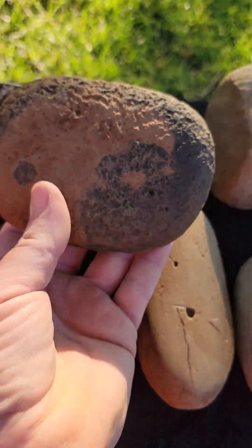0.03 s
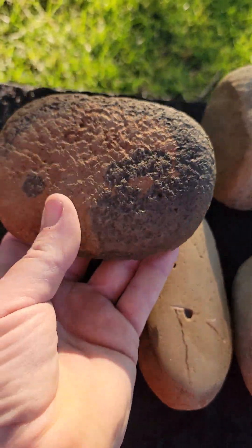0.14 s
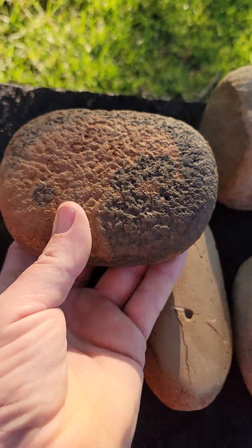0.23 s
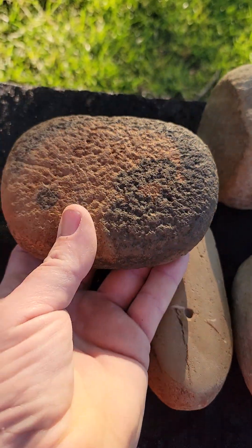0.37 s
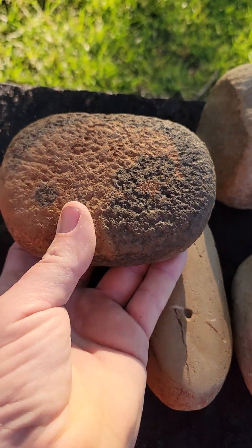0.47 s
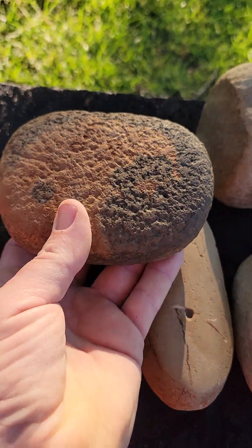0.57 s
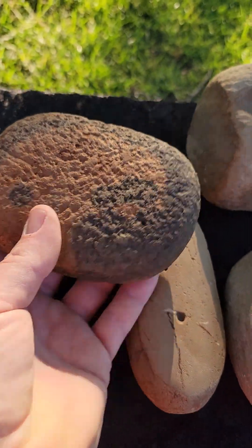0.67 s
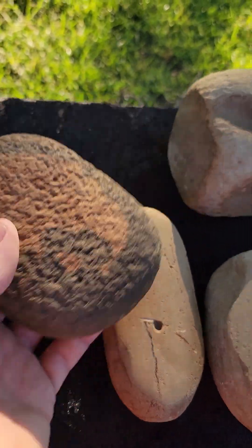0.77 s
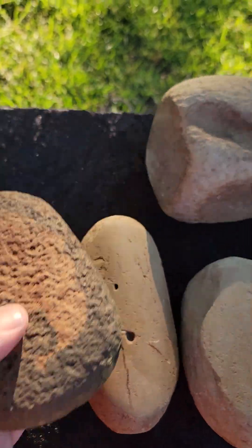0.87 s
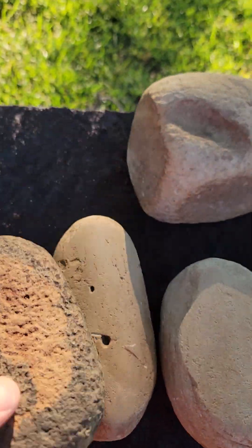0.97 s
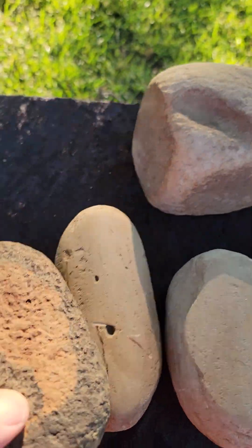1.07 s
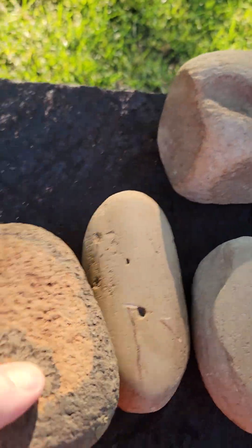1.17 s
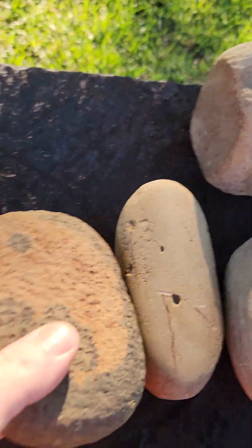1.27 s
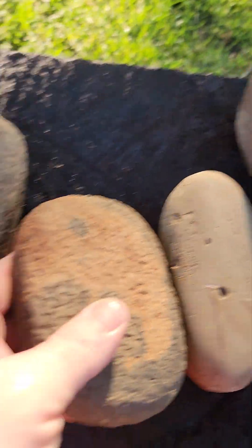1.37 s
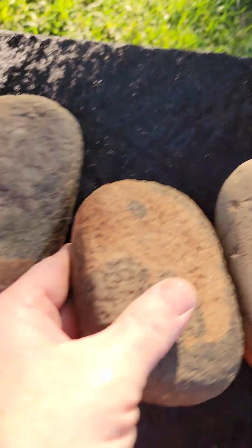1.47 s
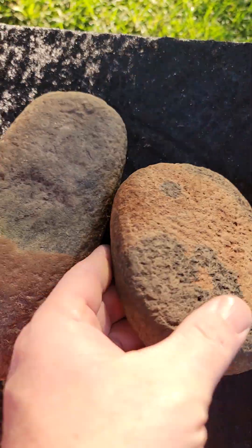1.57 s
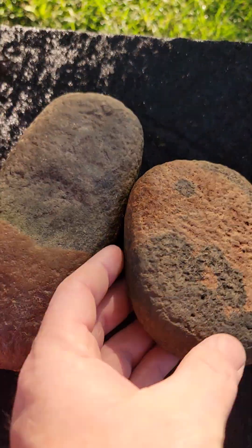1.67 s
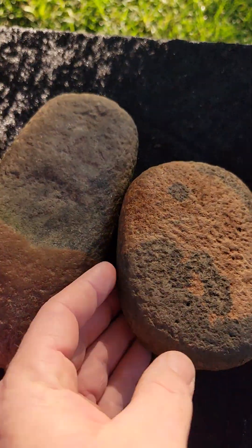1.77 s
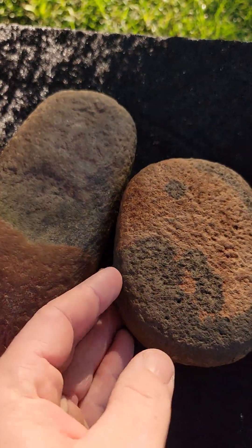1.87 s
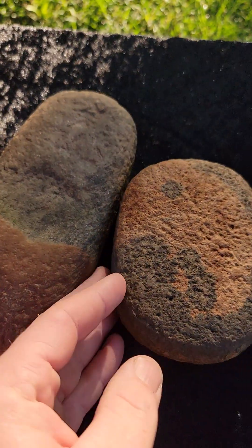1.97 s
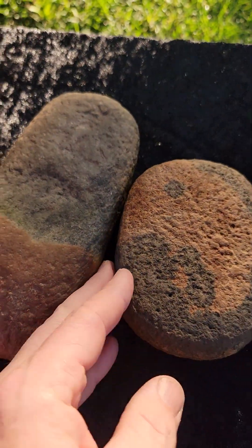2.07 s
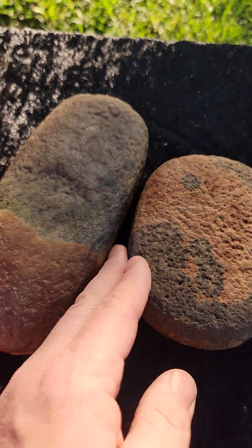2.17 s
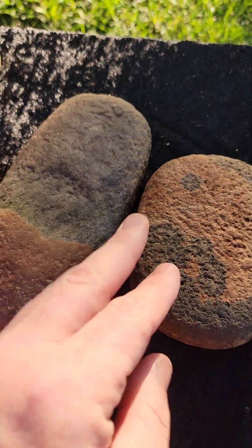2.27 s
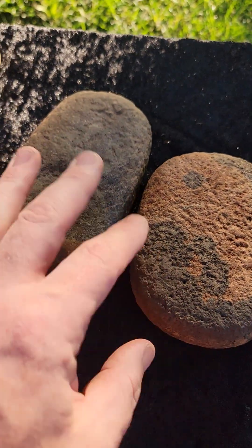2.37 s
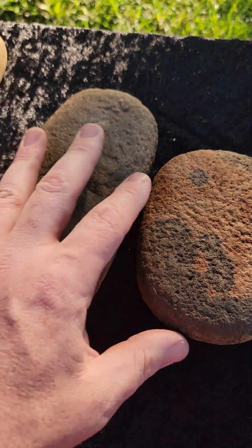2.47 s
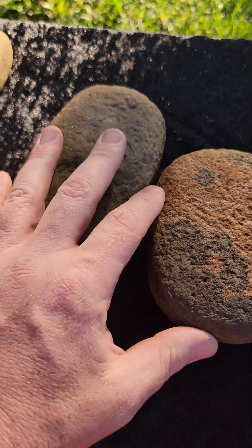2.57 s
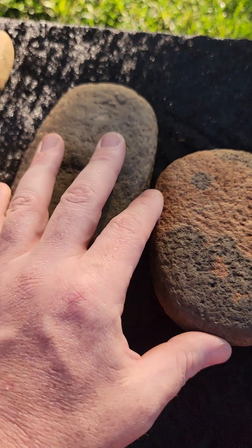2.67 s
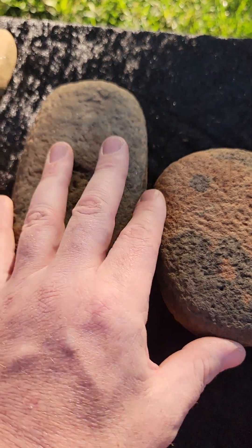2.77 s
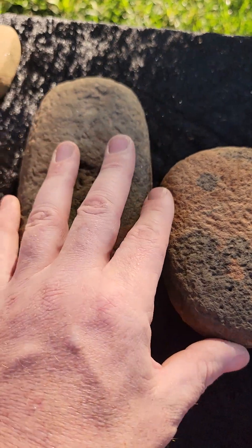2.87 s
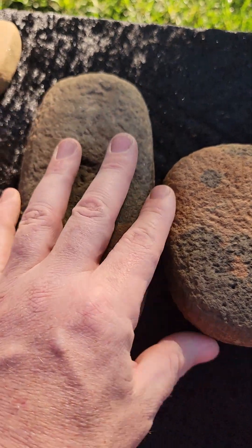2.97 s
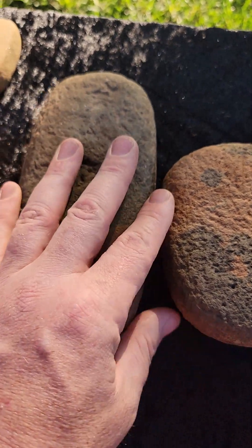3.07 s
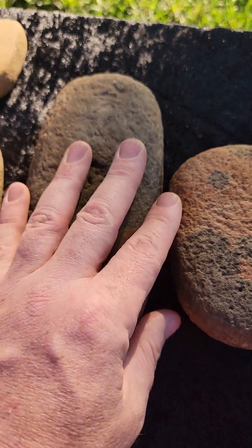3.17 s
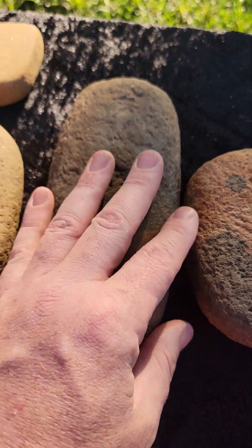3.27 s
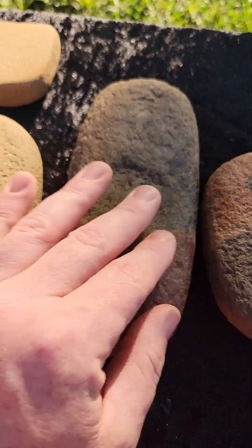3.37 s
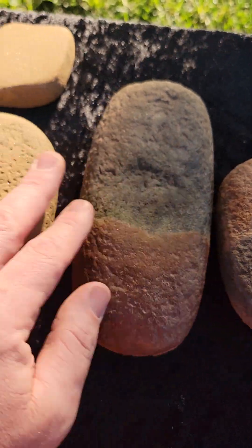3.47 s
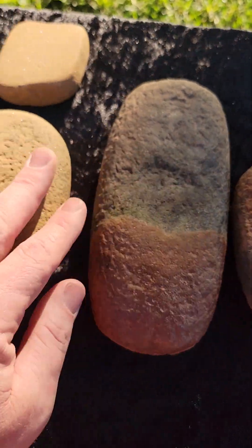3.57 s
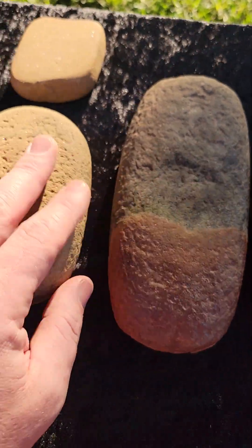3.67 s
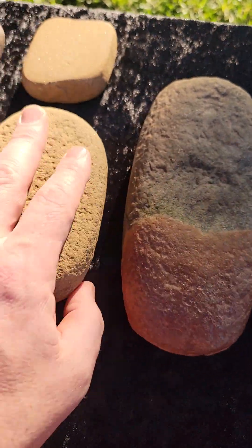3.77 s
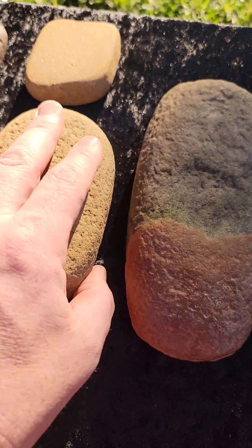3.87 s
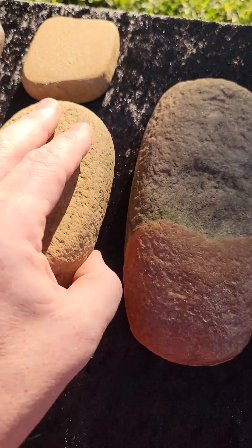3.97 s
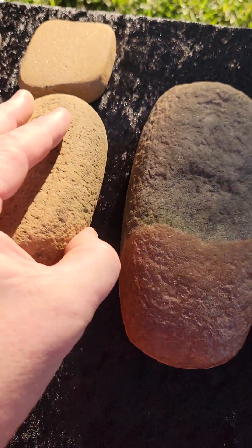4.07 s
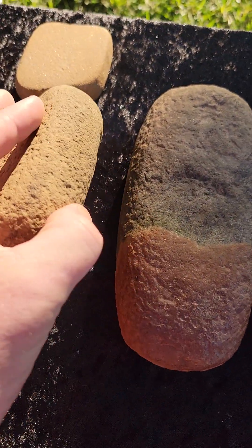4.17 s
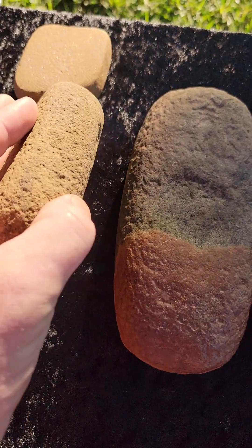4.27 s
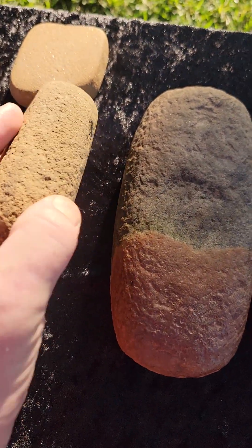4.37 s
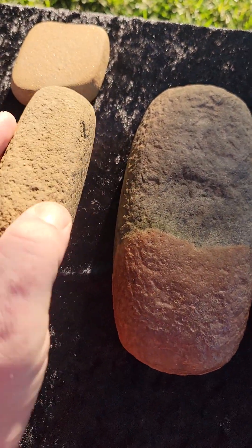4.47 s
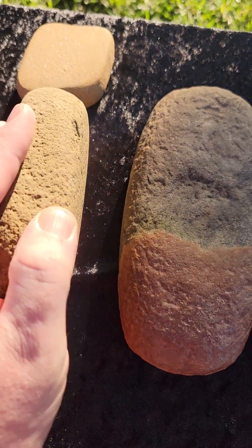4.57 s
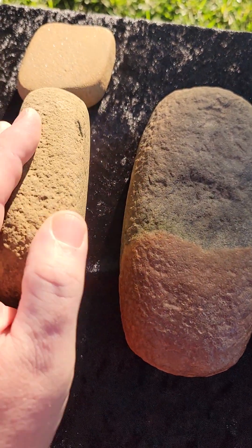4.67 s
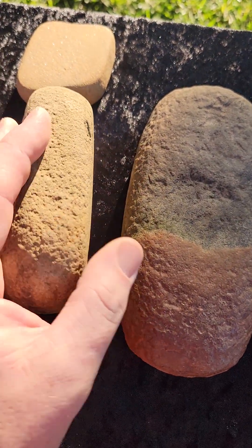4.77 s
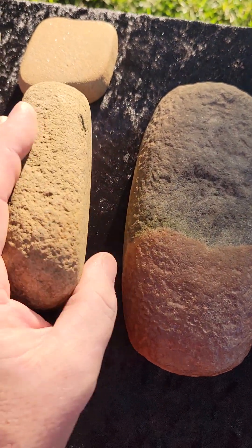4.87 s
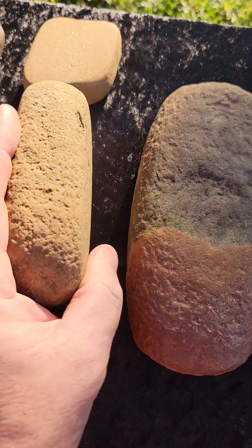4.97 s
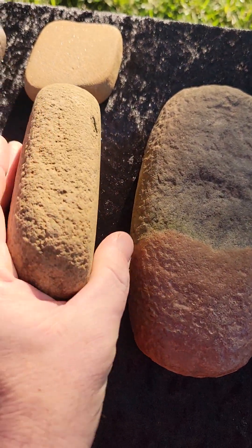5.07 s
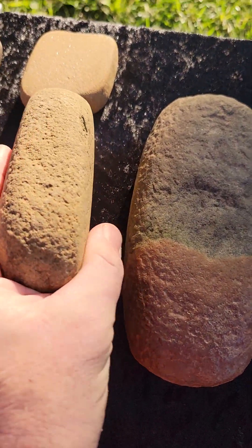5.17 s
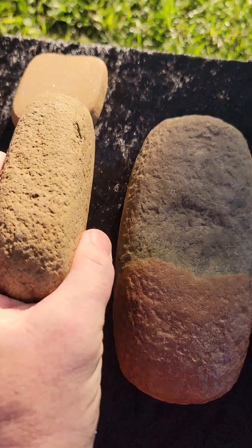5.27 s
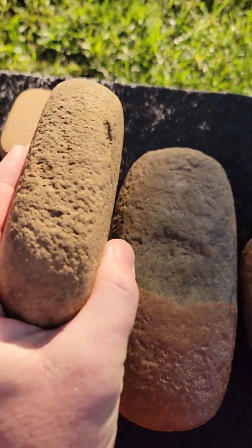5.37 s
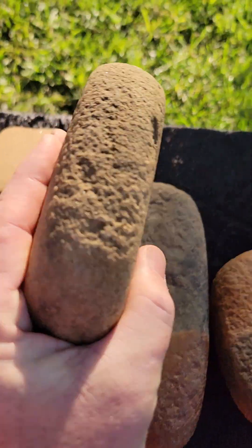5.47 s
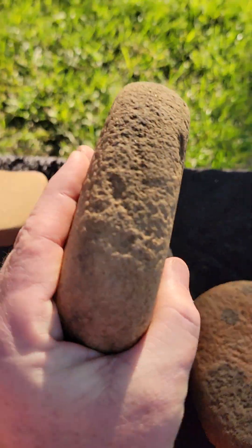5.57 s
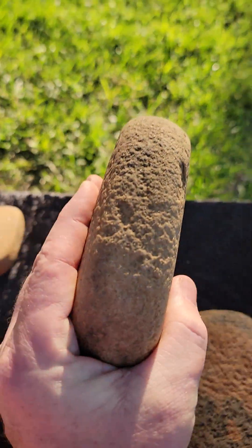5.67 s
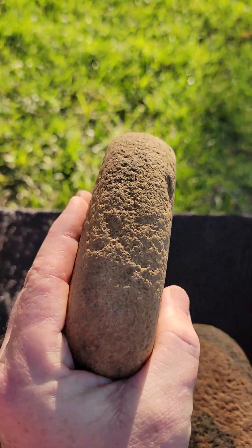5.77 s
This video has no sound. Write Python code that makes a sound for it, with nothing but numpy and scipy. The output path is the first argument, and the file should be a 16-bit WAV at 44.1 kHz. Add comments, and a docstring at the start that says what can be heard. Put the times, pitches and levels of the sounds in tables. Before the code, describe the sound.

A stone is set down with a few sharp clacks and a hollow knock, then quiet handling amid birdsong and far-off road noise.

```python
"""Outdoors: a hand sets river stones down on a hard cover; they click together and knock the panel below.
Clicks are short bursts of partials over decaying panel modes; drags, grazes and skin are shaped noise.
Behind: sine engine notes, a wavering hum and noise rumble; birds are gliding sines with a tree echo,
over a noise chorus, insects and leaf hiss. Two ports: far sound reaches the left one first, by about 0.5 ms."""
import sys
import numpy as np
from scipy import signal
from scipy.fft import rfft, irfft, next_fast_len
from scipy.io import wavfile
from scipy.ndimage import uniform_filter1d, map_coordinates

SR = 44100
rng = np.random.default_rng(int(sys.argv[2]) if len(sys.argv) > 2 else 0)


def to_wav(sig):
    """Store sig (one row per channel, or 1-D mono) as 16-bit WAV at the path in sys.argv[1].

    Samples outside -1..1 are clipped; the rate is SR.
    """
    pcm = np.clip(np.atleast_2d(sig), -1, 1) * 32767
    pcm = np.round(pcm).astype(np.int16)
    wavfile.write(sys.argv[1], SR, pcm.T)  # frames by channels


N = 257140

# steady layers: (t/s, tyre roar level/dB, bird chorus level/dB, insect level/dB)
LAYER_LEVELS = [(0, -52, -63, -57.5), (.25, -52.5, -65, -67), (.8, -60, -70, -73), (1.15, -57, -64, -69.5),
                (1.55, -53.5, -66.5, -73.5), (1.9, -59, -67.5, -71.5), (2.3, -54.5, -68.5, -69.5),
                (2.6, -56, -64.5, -65.5), (2.95, -58.5, -70, -71.5), (3.45, -59.5, -68, -73.5),
                (3.75, -58.5, -68, -71), (4.0, -56.5, -67, -72.5), (4.3, -58.5, -70.5, -75),
                (4.6, -55.5, -66.5, -65.5), (5.05, -57.5, -64, -67), (5.5, -58, -70.5, -72),
                (5.83, -58.5, -66.5, -73)]
# hiss spectrum of leaves and hand: (f/Hz, relative level/dB per Hz)
RUSTLE_SPECTRUM = [(4400, -6.5), (7500, 5), (8300, -3.5), (9700, -2), (11200, -11.5), (12700, -7),
                   (15000, -3.5), (16000, -12)]


def amp(db):
    """Amplitude ratio of a level in dB."""
    return 10 ** (np.asarray(db) / 20)


def unit(x):
    """x scaled to rms 1."""
    return x / np.sqrt(np.mean(x ** 2) + 1e-20)


def along(points, hz):
    """(f/Hz, value) points interpolated on a log frequency axis."""
    f, v = np.transpose(points)
    return np.interp(np.log(hz + 1), np.log(f + 1), v)


def curves(rows):
    """One value per sample for each column after the time."""
    s, *cols = np.transpose(rows)
    return [np.interp(np.arange(N) / SR, s, c) for c in cols]


def wobble(rate_hz):
    """Smooth random curve with rate_hz knots a second."""
    knots = rng.standard_normal(int(N * rate_hz / SR) + 4)
    return map_coordinates(knots, [np.arange(N) * rate_hz / SR])


def filtered(x, response):
    """x with its spectrum multiplied by response(hz)."""
    m = next_fast_len(N + SR // 2)
    return irfft(rfft(x, m) * response(np.fft.rfftfreq(m, 1 / SR)), m)[..., :N]


def ports(left, right, pan_db, late_samples=20):
    """Far sound comes from the left: the right port hears it late_samples later."""
    return np.array([left * amp(pan_db / 2), np.roll(right, late_samples) * amp(-pan_db / 2)])


def rush(spectrum, patchy_db, pan_db):
    """Stereo noise of rms 1, patchy in time and frequency; the ports differ more at high frequency."""
    # likeness of the ports: (f/Hz, correlation [0..1])
    likeness = [(60, 0.9), (130, 1), (300, 0.87), (800, 0.81), (3000, 0.11), (12000, 0.065)]
    z = signal.stft(rng.standard_normal((2, N)), nperseg=512)[2]
    field = uniform_filter1d(rng.standard_normal(z.shape[1:]), size=5, axis=0)
    field = uniform_filter1d(field, size=10, axis=1)
    pair = signal.istft(z * amp(patchy_db * unit(field)), nperseg=512)[1][:, :N]

    def mid_side(hz):
        angle = np.arccos(np.clip(along(likeness, hz), -1, 1)) / 2
        return amp(along(spectrum, hz)) * [np.cos(angle), np.sin(angle)]

    mid, side = filtered(pair, mid_side)
    return unit(ports(mid + side, mid - side, pan_db))


def tone(rows, waver_db, edge_s, flutter):
    """Sine along (t/s, f/Hz, level/dB) rows, faded at both ends; level wavers, pitch flutters."""
    s, hz, db = np.transpose(rows)
    span = np.arange(round(s[0] * SR), min(round(s[-1] * SR), N))
    t = span / SR
    knots = (t - s[0]) / edge_s
    slow, fast = (map_coordinates(rng.standard_normal(200), [speed * knots]) for speed in (.3, 3))
    gate = np.clip(np.minimum(t - s[0], s[-1] - t) / edge_s, 0, 1)
    pitch_hz = np.interp(t, s, hz) * (1 + flutter * fast)
    phase = 2 * np.pi * (np.cumsum(pitch_hz) / SR + rng.random())
    level = amp(np.interp(t, s, db) + waver_db * slow)
    out = np.zeros(N)
    out[span] = np.sqrt(2) * gate * level * np.sin(phase)
    return out


def narrow(rows, size):
    """Soft bursts of noise in one narrow high resonance; a larger size makes it narrower."""
    out = np.zeros((2, N))
    for s, length, hz, db, pan_db in rows:
        t = np.arange(round(length * SR)) / SR
        rough = uniform_filter1d(rng.standard_normal((2, 2, SR))[..., :len(t)], size=size)
        band = rough[0] * np.cos(2 * np.pi * hz * t) + rough[1] * np.sin(2 * np.pi * hz * t)
        swell = np.sin(np.pi * t / length) ** .6
        level = amp([[db + pan_db / 2], [db - pan_db / 2]])
        out[:, round(s * SR):][:, :len(t)] += level * unit(band) * swell
    return out


def far_roads():
    """Rumble, road drone and tyre roar: three shaped noises with wandering levels."""
    # spectra: (f/Hz, relative level/dB per Hz)
    rumble_spectrum = [(8.8, -54), (15, -4.5), (40, -15), (70, 4), (93, 1), (156, -8.5), (200, -13.5),
                       (260, -22), (440, -120)]
    road_spectrum = [(88, -31), (150, -16.5), (195, -3.5), (264, -8.5), (302, -5.5), (430, -13.5),
                     (560, -71), (950, -120)]
    tyre_spectrum = [(250, -28), (430, -15), (488, -3), (527, -5), (816, -1.5), (1130, -2.5), (1800, -17),
                     (2340, -30), (3960, -120)]
    # road drone: (t/s, level/dB)
    road_level = [(0.0, -56.5), (0.41, -59.5), (0.86, -59.5), (1.57, -56.5), (3.68, -60.5), (3.9, -56.5),
                  (4.27, -58), (4.81, -58), (5.29, -58.5), (5.83, -59.5)]
    start_db, growth_db_per_s = -52, .44  # traffic nears
    rumble_db = start_db + growth_db_per_s * np.arange(N) / SR + .8 * wobble(4.2)
    rumble = amp(rumble_db) * rush(rumble_spectrum, patchy_db=1.0, pan_db=-1.0)
    road_db = curves(road_level)[0] + .99 * wobble(5.03)
    road = amp(road_db) * rush(road_spectrum, patchy_db=.1, pan_db=-3.5)
    tyre_db = curves(LAYER_LEVELS)[0] + .35 * wobble(7)
    tyres = amp(tyre_db) * rush(tyre_spectrum, patchy_db=1.1, pan_db=-1.8)
    return rumble + road + tyres


def engines():
    """Far engine notes: one sine per engine pitch, with slow level waver and slight flutter."""
    # speeds up, changes gear, speeds up again; one table a gear: (t/s, f/Hz, level/dB)
    truck = [
        [(0, 126, -58.5), (.7, 128.5, -55), (1.4, 131, -51.5), (2.1, 134, -55.5), (2.8, 137.5, -56.5),
         (3.15, 134, -60)],
        [(2.95, 108.5, -53.5), (3.5, 110.5, -57), (4.2, 112.5, -65.5), (5, 114.5, -55), (5.83, 115.5, -63)],
    ]
    # second engine: (t/s, f/Hz, level/dB)
    car = [(2.2, 65.8, -71), (3, 67.34, -56), (3.5, 68.82, -51.5), (4.001, 70.95, -49), (4.5, 71.9, -71),
           (5, 71.74, -48), (5.4, 71.35, -54), (5.83, 72.6, -50)]
    notes = sum(tone(rows, waver_db=1.5, edge_s=.09, flutter=.004) for rows in (*truck, car))
    return ports(notes, notes, pan_db=-1.5)


def hum():
    """Steady 60 Hz sine of randomly wavering level."""
    level = amp(-57.5 + 4 * wobble(3.92))
    wave = np.sqrt(2) * level * np.sin(2 * np.pi * 60 * np.arange(N) / SR)
    return ports(wave, wave, pan_db=-1.5)


def chorus():
    """Blurred chorus of far birds: patchy band noise."""
    # (f/Hz, relative level/dB per Hz)
    chorus_spectrum = [(880, -26), (1500, -57), (1780, -3), (2070, 7.5), (2260, 2.5), (3220, 1), (3700, 2),
                       (4810, -20), (8140, -120)]
    level = amp(curves(LAYER_LEVELS)[1] + 1.03 * wobble(8.4))
    return level * rush(chorus_spectrum, patchy_db=1.95, pan_db=-2.0)


def insects():
    """Band of insects: patchy high noise."""
    # (f/Hz, relative level/dB per Hz)
    insect_spectrum = [(2060, -48), (3500, -27), (3610, -9.5), (4130, 6), (4920, -3.5), (5320, -5),
                       (6180, -4.5), (7240, -8.5), (8280, -26), (9000, -15), (11700, -33), (19800, -120)]
    level = amp(curves(LAYER_LEVELS)[2] + .96 * wobble(5.5))
    return level * rush(insect_spectrum, patchy_db=2.5, pan_db=-5.0)


def leaves():
    """Leaf hiss: faint, very patchy high noise."""
    return amp(-80.5) * rush(RUSTLE_SPECTRUM, patchy_db=6.5, pan_db=-2.0)


def whine():
    """Thin whine, perhaps one insect: bursts of very narrow noise."""
    # (t/s, length/s, f/Hz, level/dB, left-right level/dB)
    whine_bursts = [(.746, .75, 7040, -78, -10), (3.416, 0.46, 6980, -74, -2), (4.285, .1, 7120, -71.5, -3),
                    (4.415, 0.12, 7170, -69.5, -3), (5.31, 0.33, 7100, -71, -6)]
    return narrow(whine_bursts, size=300)


def murmur(count, db_at_2khz):
    """Many fainter whistles at random moments and pitches, deep in the trees; higher ones are weaker."""
    rows = []
    for when, size, height, *bends in rng.random((count, 5)):
        hz = 2000 * 3 ** height
        middle, end = (1 + .12 * (b - .5) for b in bends)
        db = db_at_2khz - 6 * np.log2(hz / 2000)
        pan_db = 12 * bends[1] - 6
        rows.append((when * N / SR, .02 + .06 * size, hz, hz * middle, hz * end, db, pan_db))
    return rows


def echo(sent):
    """Echo off trees: convolution with decaying noise, decay time set by frequency."""
    # (f/Hz, t60/s)
    tree_decay = [(2000, .27), (6000, .32)]
    hz, t, z = signal.stft(rng.standard_normal((2, SR // 2)), SR, nperseg=256)
    decay = amp(-60 * t / along(tree_decay, hz)[:, None])
    tail = signal.istft(z * decay, SR, nperseg=256)[1]
    return signal.fftconvolve(sent, tail / np.linalg.norm(tail[0]), axes=1)[:, :N]


def near_bird():
    """Two calls of summed whistled strands; the ports get opposite spectral tilts."""
    # one table a strand; calls climb to a top note and fall, over lower held notes: (t/s, f/Hz, level/dB)
    song = [
        [(.812, 2590, -72), (.84, 2640, -64), (.86, 2785, -54.5), (.876, 2830, -60)],
        [(.885, 3020, -54), (.905, 3070, -57), (.93, 3060, -62), (.96, 3000, -62)],
        [(.876, 2920, -60), (.888, 3270, -55), (.897, 3480, -53), (.906, 3580, -58), (.92, 4030, -52),
         (.932, 4090, -52), (.948, 3750, -53), (.958, 3340, -57), (.968, 3110, -58), (.992, 3100, -59),
         (1.0, 3150, -68)],
        [(3.603, 2780, -62), (3.616, 2845, -57), (3.64, 3020, -55), (3.654, 3080, -48), (3.668, 3260, -45),
         (3.682, 3300, -55), (3.7, 3200, -59)],
        [(3.63, 3100, -62), (3.65, 3300, -58), (3.672, 3600, -55), (3.686, 3900, -55), (3.696, 4110, -48),
         (3.712, 4065, -49), (3.721, 3900, -52), (3.726, 3450, -56), (3.732, 3170, -46), (3.741, 3025, -45),
         (3.752, 2900, -62)],
    ]
    # one row a call: (right port late/samples, tilt of higher notes to the right/dB per octave, each port)
    facing = [(22, 3), (14, 14)]
    even_hz = 3550  # no tilt here
    out = np.zeros((2, N))
    for strands, (late, turn_db) in zip((song[:3], song[3:]), facing):
        call = sum(tone(note, waver_db=2.2, edge_s=.005, flutter=.011) for note in strands)

        def tilt(hz):
            octaves = np.log2(np.clip(hz, 2500, 4500) / even_hz)
            return amp(np.outer([-1, 1], turn_db * octaves))

        out += filtered(ports(call, call, pan_db=1.5, late_samples=late), tilt)
    return out


def far_birds():
    """Short whistles, each a sine gliding through three pitches."""
    # (t/s, length/s, start f/Hz, middle f/Hz, end f/Hz, level/dB, left-right level/dB)
    chirps = [(0.233, 0.065, 3000, 2860, 2730, -65, 1), (0.314, 0.07, 2800, 2763, 2805, -59.5, 5),
              (.375, 0.085, 2810, 2760, 2806, -69, 5), (0.534, 0.17, 4250, 4180, 4230, -75, -6),
              (0.797, 0.014, 4340, 4400, 4500, -62, -6), (0.819, 0.024, 4850, 5080, 5360, -59.5, -12),
              (.845, .012, 5450, 5250, 5100, -64, -4), (.858, .018, 5400, 5400, 5350, -68, -2),
              (.806, .014, 3450, 3480, 3450, -67, 4), (0.809, 0.018, 4650, 4840, 5000, -55, 4),
              (0.822, 0.025, 5250, 5500, 5700, -66, 9), (0.84, 0.022, 5000, 4900, 4950, -66, 0),
              (0.84, .022, 5980, 6020, 6050, -65, -2), (4.545, 0.049, 5450, 5420, 5430, -72, -5),
              (0.828, 0.035, 3300, 3340, 3250, -63, 10), (1.056, .03, 5700, 5480, 4870, -72.5, -7),
              (0.885, 0.035, 2320, 2094, 2040, -69, 9), (2.412, 0.022, 4230, 4400, 4600, -69, -8),
              (2.447, .025, 4340, 4640, 4650, -67, -6), (2.54, .035, 3180, 3150, 3200, -70, 3),
              (2.685, 0.054, 2100, 2070, 2020, -68, 1), (2.545, .032, 5400, 5250, 4750, -71, 0),
              (2.578, .018, 2350, 2280, 2230, -70, -8), (2.612, .04, 2250, 2210, 2190, -72, -8),
              (2.704, 0.034, 2970, 3010, 2970, -69, 12), (2.607, 0.025, 5050, 5100, 5100, -70, -1),
              (2.628, .03, 4750, 4700, 4450, -66.5, -5), (2.674, 0.045, 2610, 2460, 2500, -62.5, 4),
              (2.897, 0.06, 2135, 2140, 2130, -69, 4), (2.995, 0.11, 5930, 5940, 5900, -77.5, 1),
              (3.077, .022, 4750, 5330, 5300, -64, 4), (3.086, 0.026, 5300, 5200, 4900, -69, 2),
              (3.109, 0.027, 5950, 6130, 6170, -71, -3), (3.13, 0.025, 4850, 5400, 5100, -66, 7),
              (3.15, 0.039, 4820, 4700, 4200, -73, 1), (3.269, 0.033, 3280, 3450, 3230, -65, -1),
              (3.309, 0.027, 2240, 2300, 2420, -85, 4), (3.327, 0.056, 2560, 2210, 1980, -68.5, 5),
              (3.562, 0.027, 4230, 4400, 4750, -64, -6), (3.583, .035, 4380, 4480, 4400, -68, -4),
              (3.59, .018, 5000, 5300, 5650, -68, -2), (3.572, .015, 5500, 5600, 5650, -71, -2),
              (3.573, 0.032, 5080, 5250, 5300, -63, -4), (3.606, 0.016, 5100, 4900, 4750, -61, -2),
              (3.596, 0.037, 2570, 2590, 2560, -69, 8), (3.807, 0.026, 2070, 2100, 2100, -68, 9),
              (3.906, 0.032, 2540, 2590, 2400, -61.5, 0), (4.105, 0.024, 5620, 5600, 5260, -59.5, 3.5),
              (4.092, .022, 3610, 3920, 4300, -68, 0), (4.132, .016, 4600, 4400, 4250, -68, 2),
              (4.193, .025, 4450, 4650, 4400, -72, 0), (4.198, .03, 3490, 3700, 4000, -70, -4),
              (4.151, .022, 3750, 3950, 4200, -66, -3), (4.166, 0.026, 4970, 5060, 5100, -64.5, 6),
              (4.262, 0.027, 3410, 3910, 3980, -67.5, -1), (4.281, 0.023, 2650, 2740, 2800, -65, 8),
              (4.302, .03, 3030, 3070, 3040, -68, 9), (4.312, 0.03, 2500, 2330, 2270, -69, -10),
              (4.335, 0.094, 2270, 2230, 2250, -68.5, -11), (4.165, 0.091, 2120, 2090, 2030, -74, 0),
              (4.06, .05, 2450, 2450, 2420, -71.5, 2), (4.414, 0.033, 2500, 2530, 2600, -62, 2),
              (4.438, 0.1, 3070, 2990, 3040, -66.5, 3.5), (5.17, 0.043, 3680, 3730, 3660, -68, -15),
              (5.482, 0.06, 3080, 3230, 3500, -65, 6), (5.535, 0.036, 3600, 3640, 3600, -66, 5),
              (5.595, 0.033, 3300, 3150, 3080, -64, 1), (5.615, 0.049, 2120, 1995, 2080, -75, 4),
              (5.703, 0.033, 2720, 2750, 2680, -72, 7), (5.727, 0.089, 2640, 2383, 2424, -70, 0),
              (5.805, 0.027, 2930, 3030, 3080, -69, 5), (5.787, 0.059, 2670, 2695, 2654, -69.5, 6)]
    out = np.zeros((2, N))
    for s, length, a, b, c, db, pan_db in chirps + murmur(count=80, db_at_2khz=-77.5):
        rows = [(s, a, db), (s + length / 2, b, db), (s + length, c, db)]
        note = tone(rows, waver_db=3, edge_s=.009, flutter=.011)
        out += ports(note, note, pan_db)
    return out


def birds():
    """Near and far whistles, blurred by their echo off the trees."""
    near, far = near_bird(), far_birds()
    near_echo_db, far_echo_db = -2.5, -4.5
    return near + far + echo(amp(near_echo_db) * near + amp(far_echo_db) * far)


def hand():
    """Skin and sleeve on rough stone: each stroke of noise rises, holds and dies away."""
    # (t/s, hold/s, level/dB)
    hand_strokes = [(0.05, 0.04, -67), (0.87, 0.053, -67), (1.104, 0.037, -70.5), (1.25, 0.25, -80),
                    (1.67, 0.044, -71), (1.865, .04, -70.5), (2.0, 0.12, -75.5), (2.308, .02, -80),
                    (2.41, 0.065, -78), (2.686, 0.1, -73), (3.574, 0.023, -72), (3.69, .03, -80),
                    (4.07, .06, -77), (4.28, .02, -79), (4.47, 0.16, -75), (4.8, 0.03, -76),
                    (5.097, 0.081, -72.5), (5.27, 0.032, -70), (5.357, .12, -86), (5.56, 0.032, -76.5)]
    rise_db_per_s, fall_db_per_s = 161, 117
    t = np.arange(N) / SR
    strokes = np.zeros(N)
    for s, hold, db in hand_strokes:
        slope_db = np.minimum(rise_db_per_s * (t - s), fall_db_per_s * (s + hold - t))
        strokes += amp(db + np.minimum(0, slope_db))
    return strokes * amp(.7 * wobble(25)) * rush(RUSTLE_SPECTRUM, patchy_db=.8, pan_db=-1.5)


def drags():
    """Stone dragged over the cover: hiss broken into uneven grains, swelling and fading."""
    # (t/s, length/s, level/dB)
    drag_strokes = [(1.152, 0.033, -57), (1.372, 0.062, -54.5), (1.45, 0.051, -53), (1.535, 0.045, -52),
                    (1.654, 0.056, -59.5), (1.863, 0.16, -60.5)]
    # (f/Hz, relative level/dB per Hz)
    grit_spectrum = [(150, -30), (300, -6), (700, -5), (1300, 0), (2300, -5), (4200, -15), (6500, -35)]
    t = np.arange(N) / SR
    swell = sum(amp(db) * np.sin(np.pi * np.clip((t - s) / length, 0, 1)) ** .5
                for s, length, db in drag_strokes)
    return swell * unit(amp(4.5 * wobble(250)) * rush(grit_spectrum, patchy_db=-.5, pan_db=2))


def grazes():
    """Thin high ringing while a stone grazes the cover: narrow noise bursts."""
    # (t/s, length/s, f/Hz, level/dB, left-right level/dB)
    graze_bursts = [(1.115, .03, 8260, -73, -0.5), (1.343, .03, 8900, -74, 8), (1.354, 0.093, 7800, -76, 0),
                    (1.474, 0.025, 8300, -63, 4), (1.534, 0.028, 8340, -66, 6), (1.654, .046, 8800, -69, 8),
                    (1.868, 0.022, 8800, -65, 2), (1.89, 0.14, 8900, -74, -2), (2.227, .035, 8800, -78, 4),
                    (5.307, .03, 8300, -74, -8)]
    return narrow(graze_bursts, size=140)


def click_burst(u, hz, width_ms, lag_ms, upper_db, grains_db, phases):
    """Blunt contact: partials under a bell-shaped force, sharpened by hard grains at first touch."""
    lead_ms = .03  # the force peaks before the swing
    x = np.maximum(12 + 8.3 * (1000 * u + lead_ms - lag_ms) / width_ms, 0)
    force = (x / 12) ** 12 * np.exp(12 - x)
    turn = 2 * np.pi * hz * u
    upper = amp(upper_db) * np.sin(1.62 * turn + phases[0])
    thud = amp(-14.5) * np.sin(.5 * turn + phases[1])
    grains = amp(grains_db) * np.sin(2.8 * turn + phases[0]) * np.exp(-((x - 9) / 2.5) ** 2)
    return force * (np.sin(-turn) + upper + thud) + grains


def panel_ring(panel, after, port, soft_db_per_octave, luck_db):
    """Decaying sine modes of the cover, each building up over about its first cycle."""
    ring = np.zeros(len(after))
    for (f, level, t60, pan_db, behind), luck in zip(panel, luck_db):
        mode_db = level + luck + pan_db * (.5 - port) - soft_db_per_octave * np.log2(f / panel[0][0])
        build = 1 - np.exp(-1.5 * f * after)
        ring += amp(mode_db - 60 * after / t60) * np.sin(2 * np.pi * f * after - port * behind) * build
    return ring


def stones():
    """Each contact radiates a burst of a few cycles and rings the panel at new strengths."""
    # (t/s, left level/dB, left-right level/dB, click f/Hz, left width/ms, panel knock level/dB,
    #  hard grains re click/dB, right port late/ms)
    contacts = [(1.1194, -14.5, 5.2, 1130, 1.8, -41, -28, -.1), (1.131, -42, -2, 1040, 2, -60, -30, 0),
                (1.1835, -50, -1, 1150, 2, -58, -20, 0), (1.189, -52, 0, 2100, 3, -62, -30, 0),
                (1.2015, -48, 0, 1050, 2, -60, -20, 0), (1.216, -52, 0, 2000, 2.5, -62, -30, 0),
                (1.3509, -39.5, -5, 1030, 2.4, -56, -14, 0), (1.56537, -7, 11.5, 1090, 1.05, -20.5, -40, 0),
                (1.5867, -29, 10, 720, 2, -33, -30, .1), (1.6582, -32, 9.5, 1350, 2.4, -34, -25, .12),
                (1.6648, -39, 5, 1500, 2, -36, -25, .12), (1.6677, -36, 5, 1300, 2.5, -33, -25, .12),
                (1.6758, -35, 8, 1200, 1.8, -34, -25, .12), (1.6815, -41, 2, 1300, 2, -36, -25, .2),
                (1.6875, -42, 5, 1200, 2, -38, -25, .3), (1.6978, -39, 7, 1100, 1.5, -42, -25, .2),
                (1.7035, -39, 3, 1250, 2.3, -40, -25, .2), (1.8705, -48, 0, 1550, 1.5, -62, -8, 0),
                (2.1487, -42, -10, 2000, .3, -62, -30, 0), (2.2281, -27, 4, 950, .95, -50, -35, .4),
                (2.22918, -30.5, -2, 1300, 1.55, -56, -35, .28), (2.2489, -37, 8, 1150, .9, -60, -30, .2),
                (5.6923, -48, -10, 930, .8, -64, -30, 0)]
    # cover modes: (f/Hz, relative level/dB, t60/s, left-right level/dB, right port behind/rad)
    panel_modes = [(240, 3, .04, -2, 0), (345, -10.5, .12, -2, 1.1), (545, -12, .09, 13, 2.8),
                   (700, -5, .18, 11.5, 2.1), (780, -23, .08, 12, 2.8), (942, -14, .12, -3.5, -.6),
                   (1080, -19, .08, -2, -.5), (1219, -14, .08, 7, .9), (1376, -18, .12, -1.5, .2),
                   (1721, -13, .14, -3, 2.8), (1847, -22, .1, 10, 2.7), (2225, -31, .07, 6, 0)]
    shade_ms_per_db, widening = .075, 1.5  # shaded right port: swell lag; added width per lag
    out = np.zeros((2, N + SR))
    t = np.arange(SR // 8) / SR - .005
    after = np.maximum(t, 0)
    for s, left_db, shade_db, hz, left_ms, knock_db, grains_db, late_ms in contacts:
        shade_ms = shade_ms_per_db * max(shade_db, 0)
        luck_db = rng.normal(0, 1.5, len(panel_modes))
        phases = 2 * np.pi * rng.random((2, 2))
        upper_db = -17 + .45 * min(left_db + 15, 0)  # a faint contact is duller
        soft = min((-19 - knock_db) / 1.2, 9)  # dB/octave; a lighter blow lasts longer
        # the stone comes to rest, sooner after a light blow, and stills the panel
        settle = amp(-9 * (after / (.044 - .002 * soft)) ** 4)
        for port in (0, 1):
            db = left_db - port * shade_db
            lag_ms = port * shade_ms
            width_ms = left_ms + widening * lag_ms
            u = t - port * late_ms / 1000
            click = click_burst(u, hz, width_ms, lag_ms, upper_db, grains_db, phases[port])
            ring = panel_ring(panel_modes, after, port, soft, luck_db)
            sound = amp(db) * click + amp(knock_db) * ring * settle
            out[port, round(s * SR) - SR // 200:][:len(t)] += sound
    return out[:, :N]


def scene():
    """All layers, background to stones."""
    traffic = far_roads() + engines() + hum()
    garden = chorus() + insects() + leaves() + whine() + birds()
    return traffic + garden + hand() + drags() + grazes() + stones()


def record(dry):
    """Sharp band limit, then faint white hiss."""
    top_hz, hiss_db = 15720, -101
    return filtered(dry, lambda hz: hz < top_hz) + amp(hiss_db) * rng.standard_normal(dry.shape)


dry = scene()
out = record(dry)
to_wav(out)
```